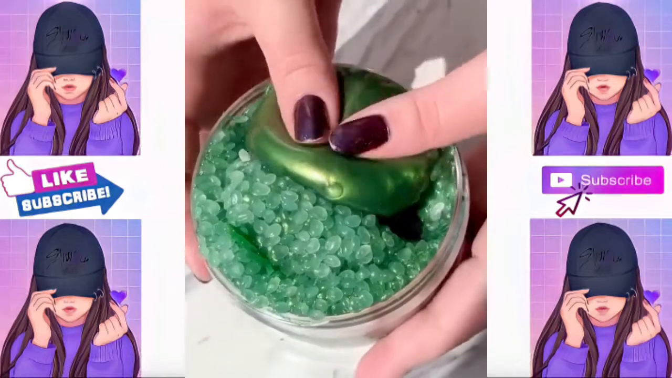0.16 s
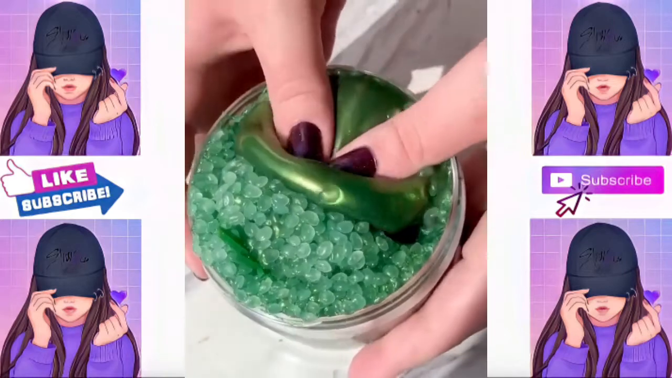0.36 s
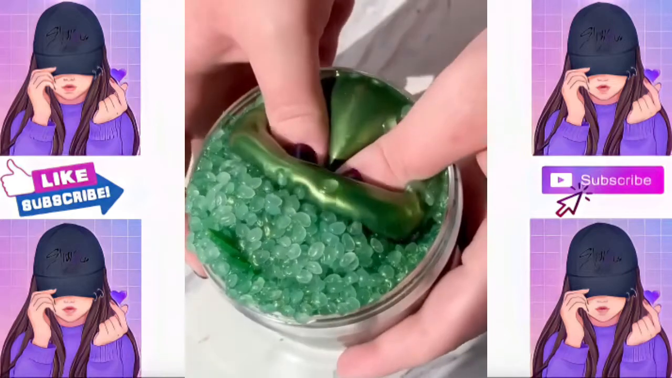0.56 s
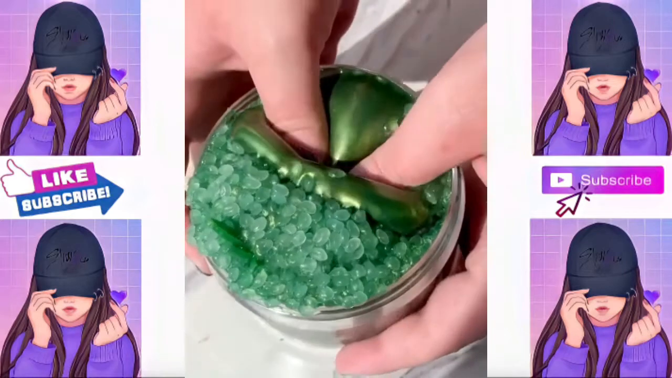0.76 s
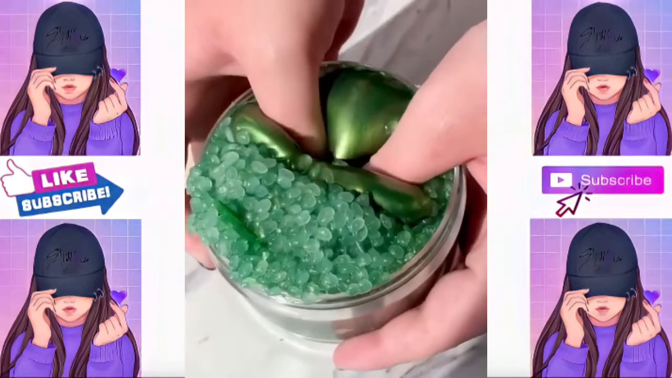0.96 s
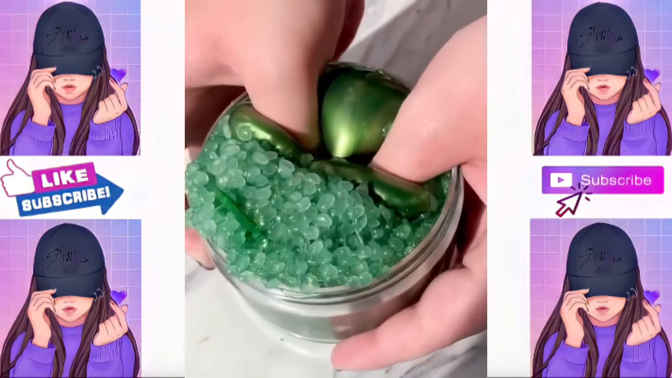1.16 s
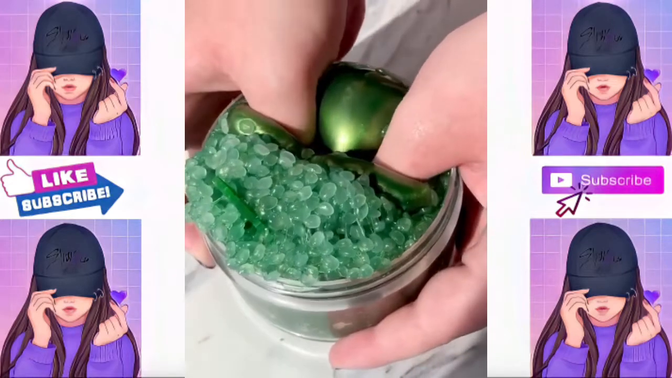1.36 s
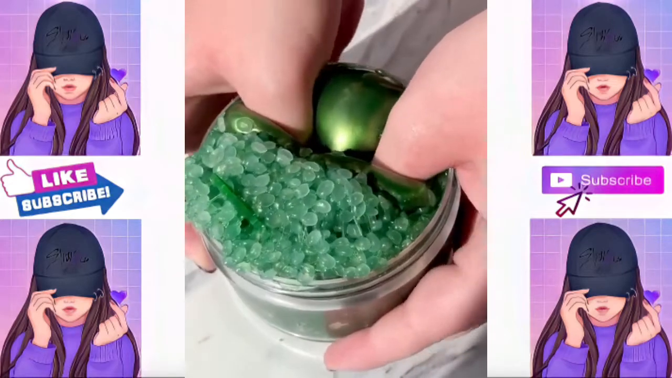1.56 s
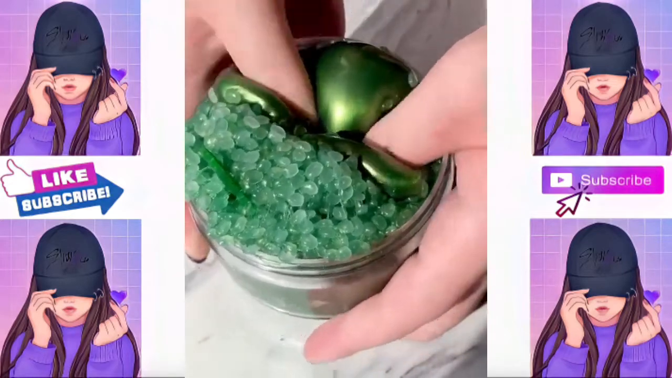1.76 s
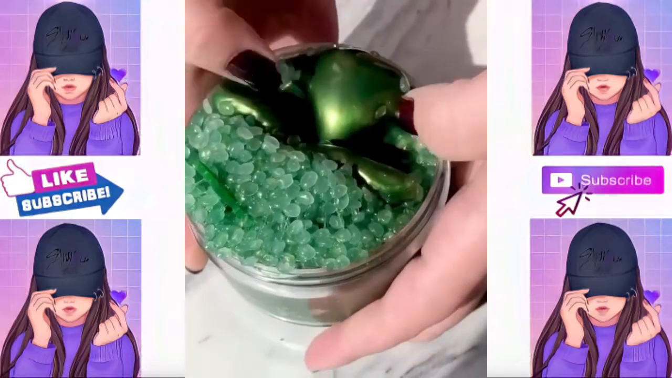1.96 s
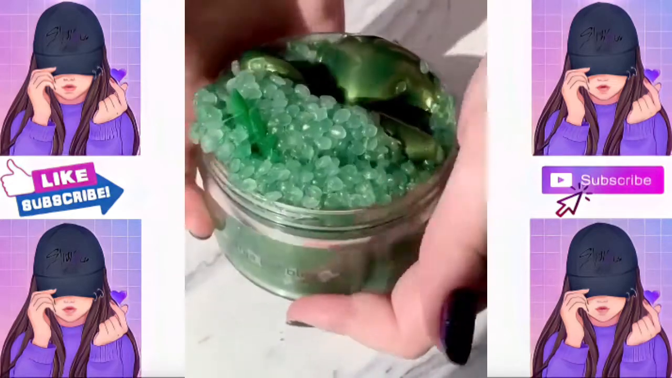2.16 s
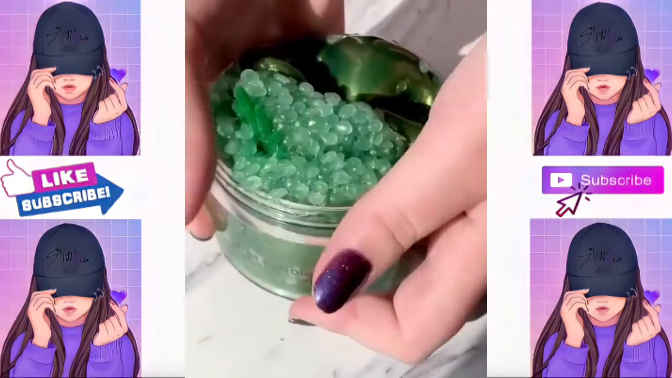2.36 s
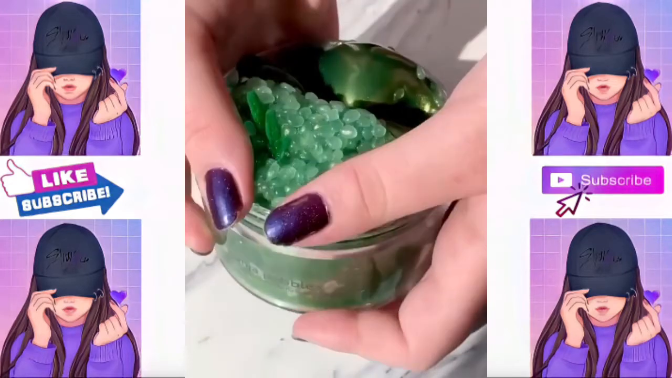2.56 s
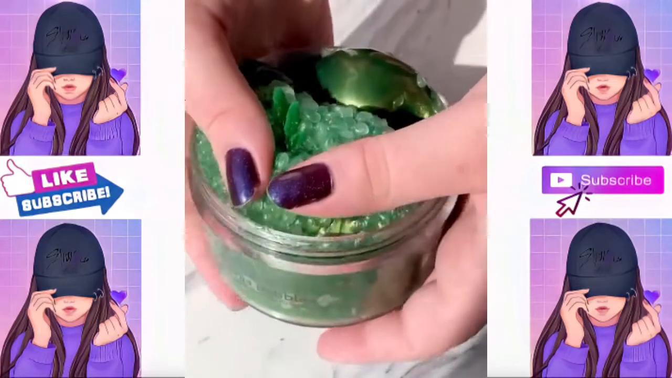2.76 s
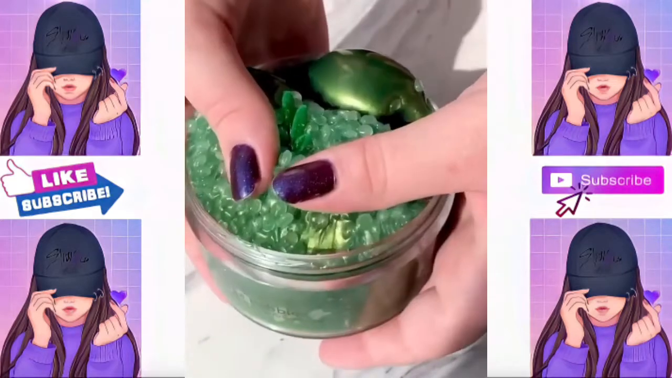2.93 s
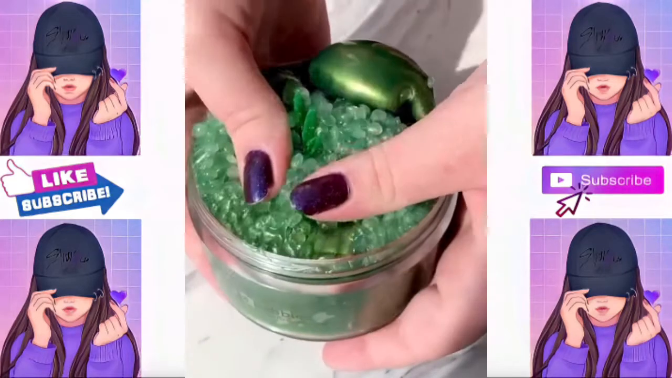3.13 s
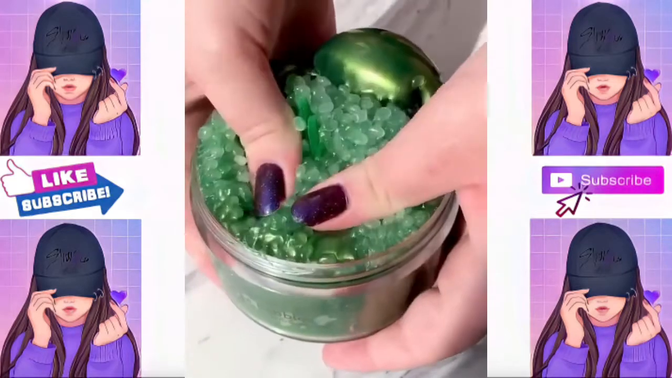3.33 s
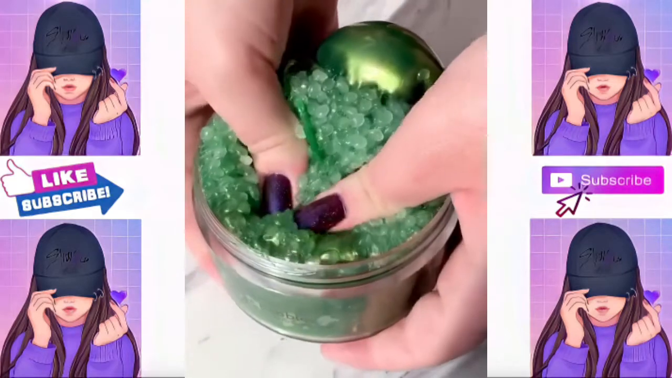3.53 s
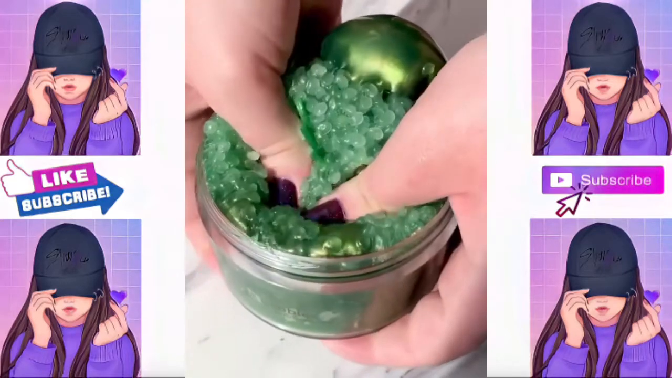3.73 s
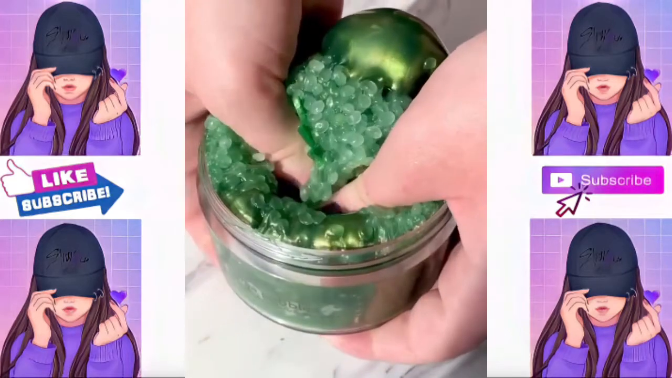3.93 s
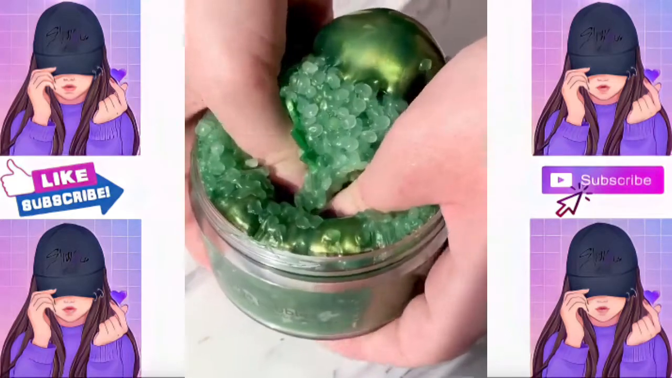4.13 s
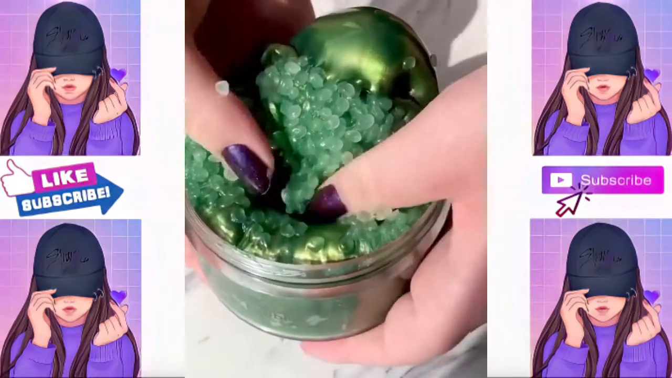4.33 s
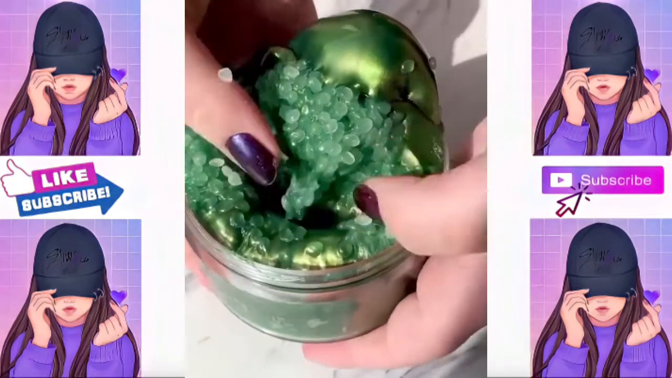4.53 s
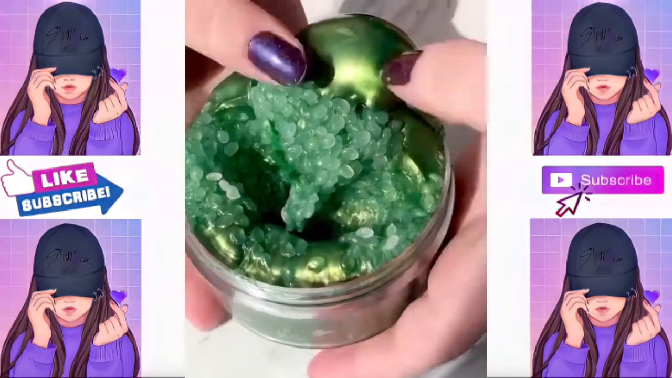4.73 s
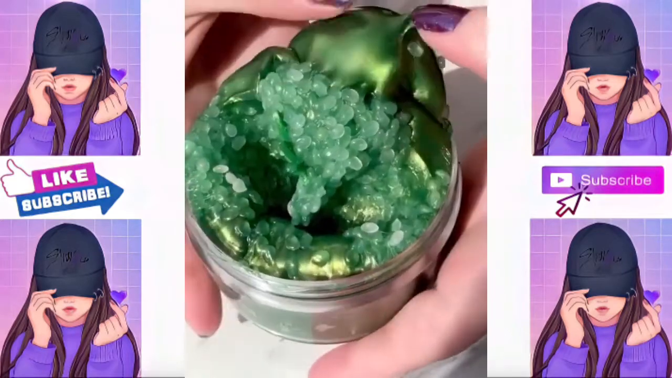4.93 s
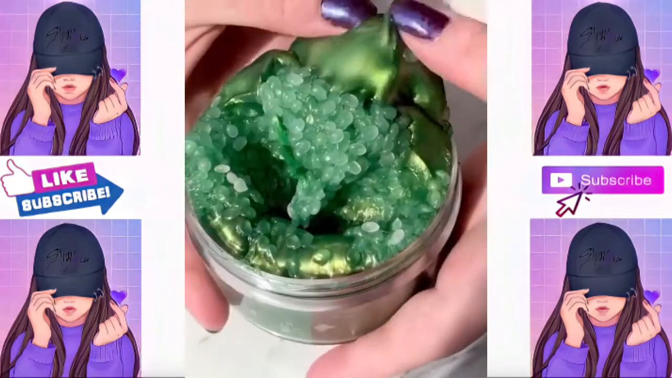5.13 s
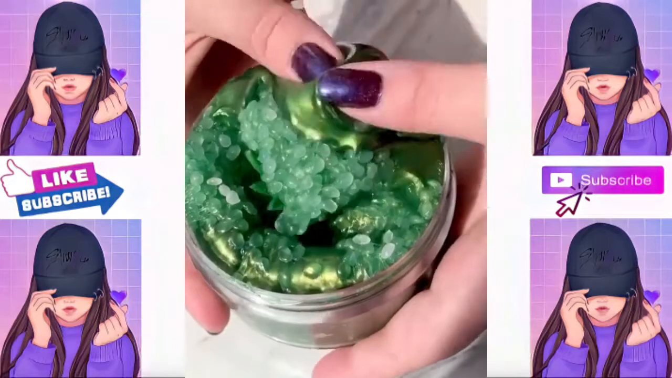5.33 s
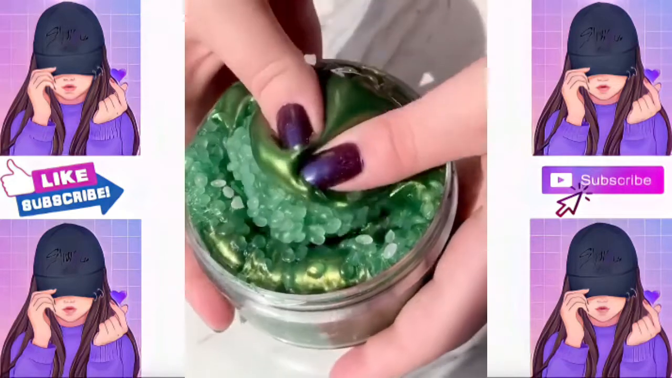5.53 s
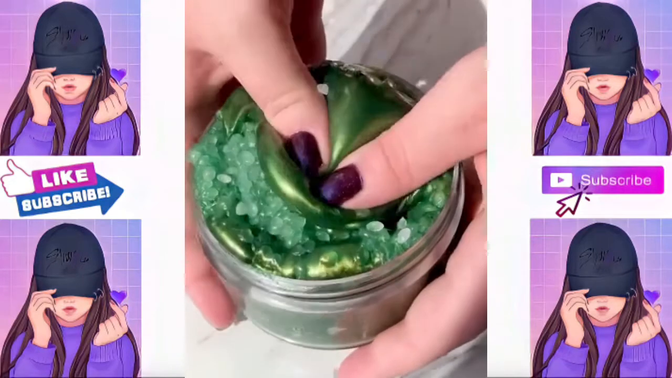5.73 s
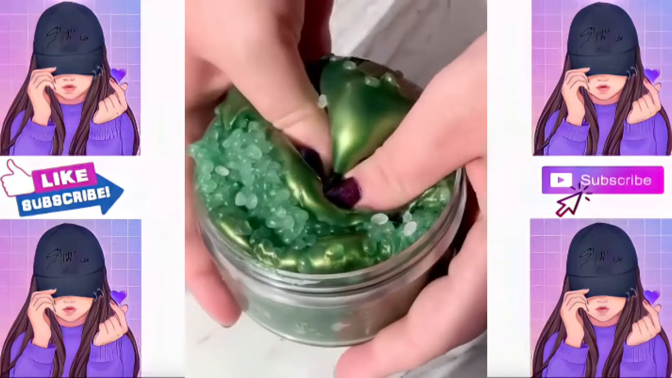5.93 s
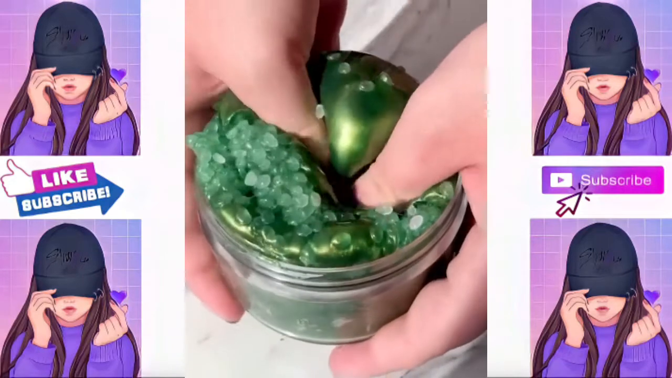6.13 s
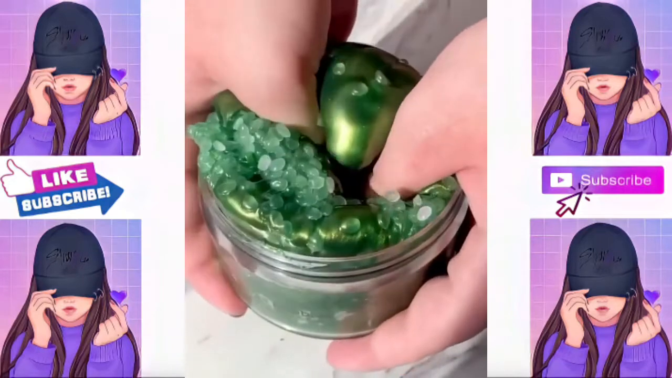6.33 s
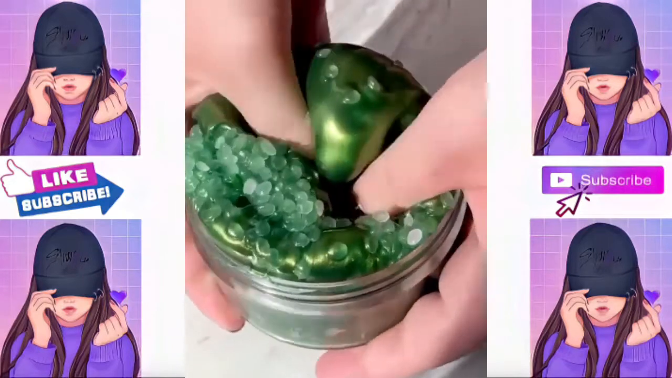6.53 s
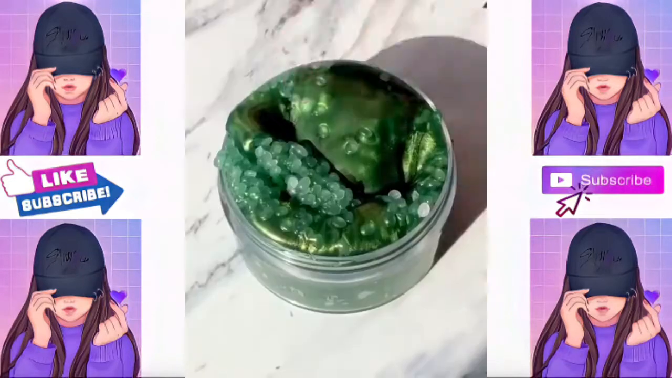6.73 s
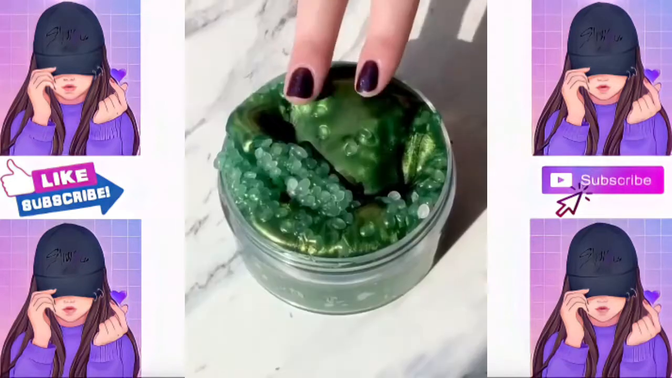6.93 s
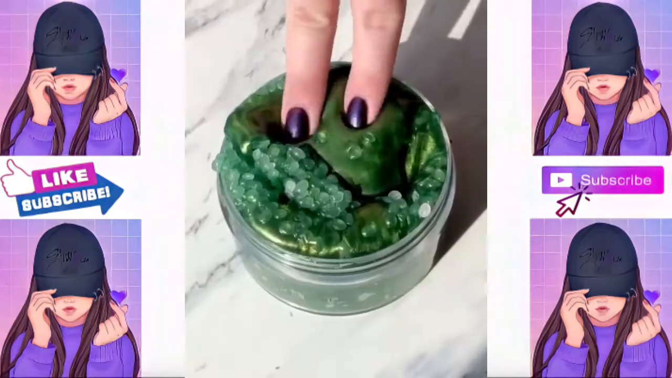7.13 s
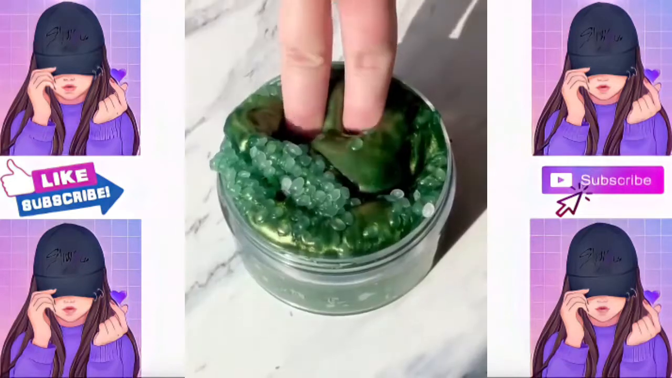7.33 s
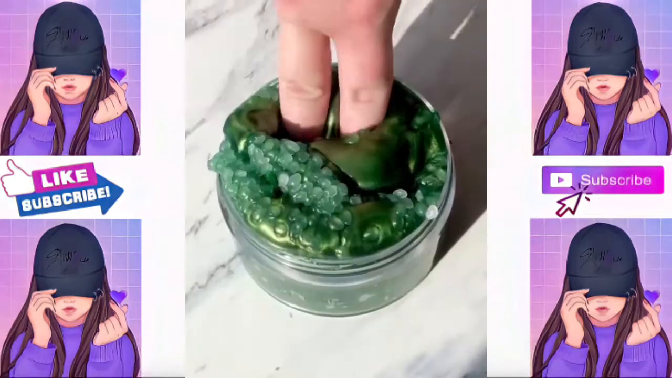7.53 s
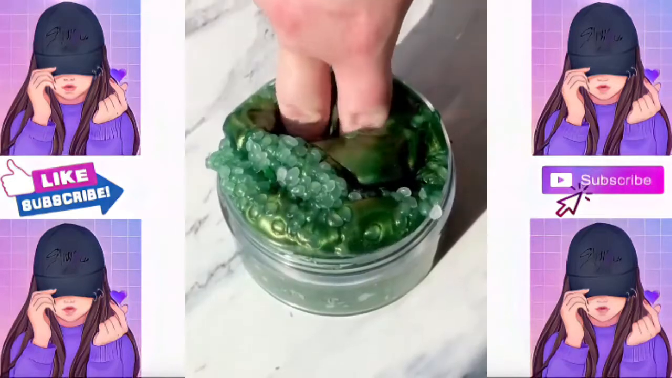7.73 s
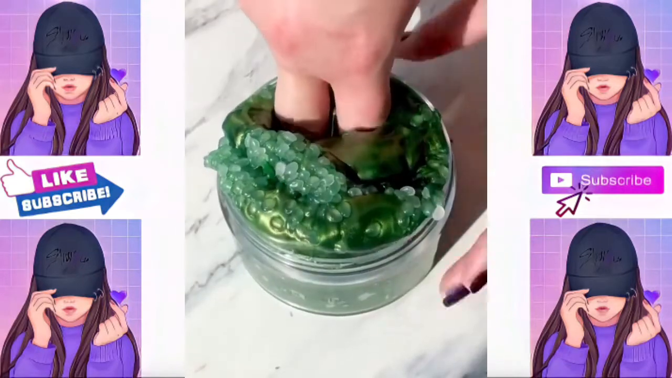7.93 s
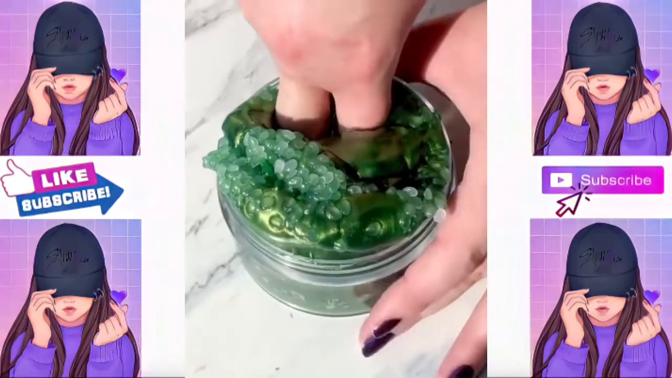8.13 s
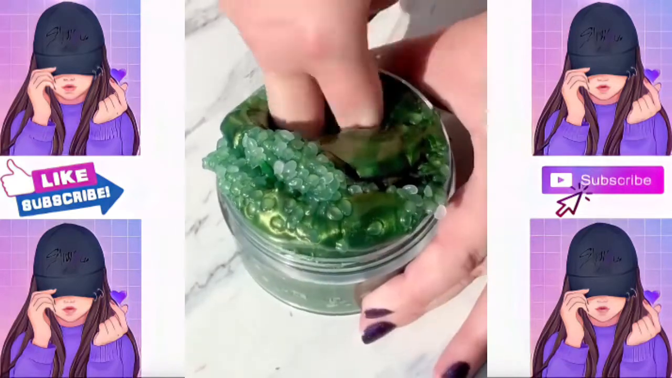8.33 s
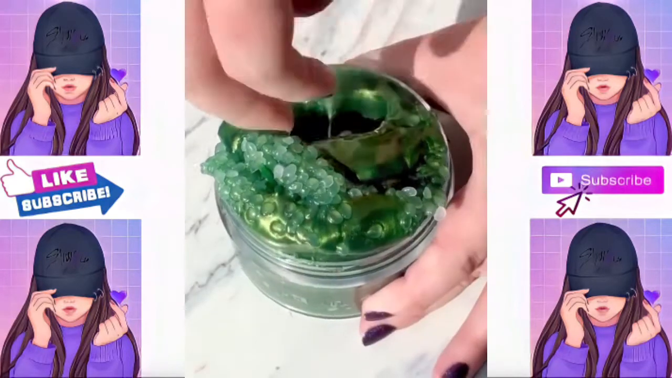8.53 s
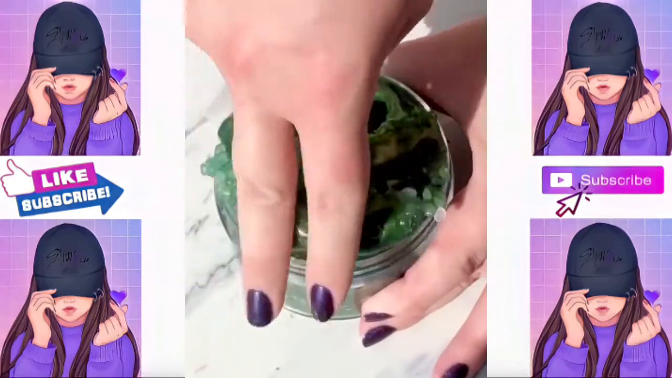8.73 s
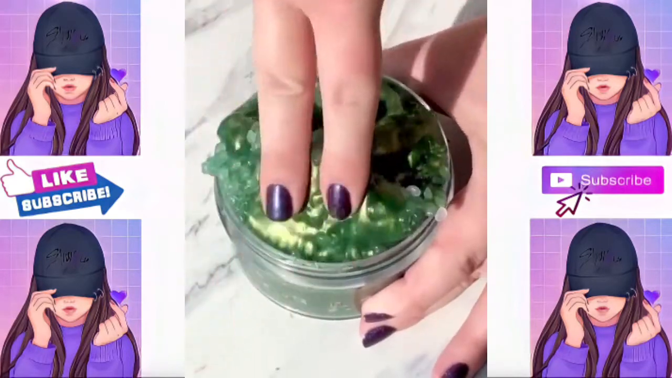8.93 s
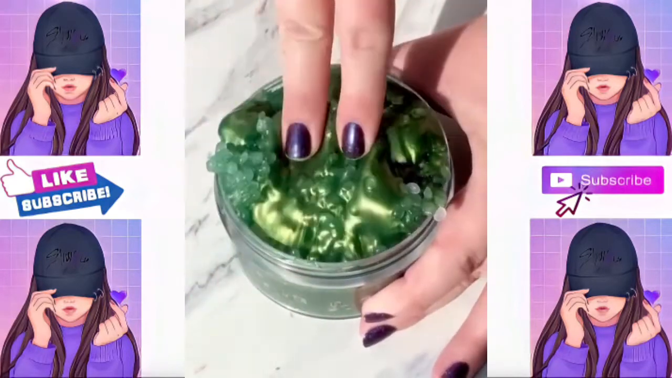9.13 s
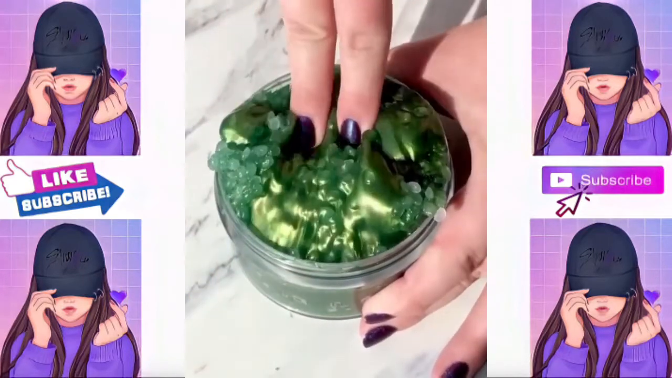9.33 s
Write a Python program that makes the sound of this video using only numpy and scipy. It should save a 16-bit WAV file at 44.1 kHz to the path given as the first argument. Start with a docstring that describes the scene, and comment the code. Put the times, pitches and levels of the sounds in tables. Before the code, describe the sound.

Very close in a quiet room, fingers press into slime packed with plastic beads. Bright crackling and irregular sharp pops come in clusters, with small wet gurgles and brief sucking squelches as fingers pull free. After a sparse stretch, a loud wet burst and jar thump come just past eight seconds, then lighter scattered pops. A faint low room rumble stays underneath.

```python
"""Wet pops, bead crackle and squelches, close up in a quiet room: fingers knead bead-filled slime in a jar.
Pops are damped pitches with a smack, clacks, ticks and a rattle; small bubbles are smeared single pitches.
Kneading scatters short rings over a lumpy rasp; pulls add hollow noise and ring the jar; rubs are smooth hiss.
Jar bumps shake the modes of a table, and shaped noise with wavering tones makes the rumble and hum."""
import sys
import numpy as np
from scipy import signal
from scipy.fft import rfft, irfft
from scipy.io import wavfile
from scipy.ndimage import uniform_filter1d

SR = 44100
rng = np.random.default_rng(int(sys.argv[2]) if len(sys.argv) > 2 else 0)


def put_to_file(sound):
    """Save the sound as 16-bit audio at rate SR, in the file named by the first command-line argument."""
    columns = np.atleast_2d(sound).T  # one column per channel
    safe = np.clip(columns, -1, 1)
    whole_steps = np.round(safe * 32767)
    wavfile.write(sys.argv[1], SR, whole_steps.astype(np.int16))


N = 414099  # length in samples

# Spectrum of the room's rumble and hiss. Each row: frequency in Hz, relative density in dB per Hz.
ROOM_SPECTRUM = [(30, -26.5), (50, -22), (100, -2.5), (240, -7), (330, -15.5), (590, -20), (1110, -24),
                 (2400, -30), (5600, -41.5), (13000, -48)]
ROOM_DB = -56.5
# Wavering hum tones. Each row: pitch in Hz, width in Hz, level in dB.
HUM_TONES = [(47.5, 5, -65.5), (62, 9.4, -65.5), (110.7, 20, -67), (191.3, 23, -67), (233.3, 6.2, -64.5)]
# Jar bumps on the table. Each row: start in seconds, level in dB, rise in seconds,
# decay by 60 dB in seconds for the narrowest table mode.
BUMPS = [(2.755, -44, 0.014, 0.35), (3.171, -35.5, 0.0037, 0.034), (3.909, -46.5, 0.0054, 0.33),
         (3.925, -42, 0.035, 0.46), (7.547, -38.5, 0.085, 0.84), (8.325, -25.5, 0.0072, 0.45),
         (8.351, -29, 0.006, 0.7)]
# Modes of the table top. Each row: pitch in Hz, width in Hz, relative level in dB.
TABLE_MODES = [(97.2, 13.7, -10), (124, 17, -8), (178.8, 26, 0), (278, 49, -5.5), (368, 77, -3.5),
               (609, 230, -3), (925, 300, -4.5)]
# Modes of the plastic jar wall. Each row: pitch in Hz, width in Hz, relative level in dB.
JAR_MODES = [(1420, 47, -6), (1960, 42, -9), (3060, 140, -5.5), (3740, 110, -1.5), (4370, 150, -2),
             (6050, 100, -1.5), (7130, 120, -6.5), (9040, 330, -1)]
# Skin sliding along the jar. Each row: start, loudest and end in seconds, level in dB.
# A row whose end comes before its start stays silent.
RUBS = [(4.473, 4.508, 4.32, -53.5), (6.752, 6.776, 6.92, -58), (7.818, 7.852, 7.92, -51.5)]
RUB_HZ, RUB_JAR_DB = 4450, 2  # centre of the hiss, and how much the jar wall colours it
# Kneading, one list for each stretch between pulls.
# Each row: time in seconds, bead crackle in dB, wet squish in dB, both before clumping.
KNEAD_STRETCHES = [
    [(0.0, -69, -91), (0.166, -67, -74.5), (0.638, -62, -64), (0.766, -55, -67), (0.86, -56.5, -64),
     (1.464, -70, -67.5), (1.66, -69.5, -73)],
    [(1.88, -66.5, -67), (2.42, -92, -94), (2.62, -52, -62), (2.79, -52.5, -59), (3.08, -65, -62),
     (3.78, -59.5, -64), (4.13, -71, -72)],
    [(4.42, -74, -79), (4.54, -73.5, -84.5), (5.29, -83, -74), (5.53, -64, -60.5), (5.96, -63.5, -62),
     (6.36, -60.5, -61.5), (6.46, -84, -71)],
    [(6.69, -71.5, -66.5), (7.174, -81, -81), (7.314, -70, -69), (7.522, -65.5, -67.5), (7.672, -70, -72),
     (7.79, -73, -74)],
    [(7.94, -70, -63), (8.122, -76, -67), (8.26, -85, -99)],
    [(8.5, -88, -69), (8.7, -79.5, -90), (8.88, -67, -74), (8.998, -81, -77), (9.096, -73, -68),
     (9.39, -59, -62.5)],
]
CLUMP_DB = 4  # spread of the level as beads give way in clumps
# Fingers sliding out or along the wet mass. Each row: start, loudest and end in seconds, crackle in dB,
# squish in dB, first and last hollow pitch in Hz, hollow level in dB against the squish, jar drive in dB.
PULLS = [(1.668, 1.786, 1.85, -43, -58.5, 1496, 1575, 4.5, -2),
         (4.168, 4.218, 4.41, -43.5, -50.5, 2666, 2200, 1, -16),
         (6.489, 6.557, 6.59, -42.5, -48.5, 2700, 2450, -2, -10),
         (6.559, 6.595, 6.668, -43.5, -50.5, 1153, 2440, 1.5, -17),
         (8.289, 8.34, 8.475, -38.5, -37, 3580, 1480, -28, 1.5)]
PULL_START_DB, PULL_END_DB, PULL_BEND = -58, -68, 1.08  # levels a pull swells from and sinks to; curve
PULL_EXTRA_GRAINS = 2.7  # share of extra squish grains while pulling
# Small bubbles gurgling out of the wet mass. Each row: start in seconds, level in dB, pitch in Hz.
BUBBLES = [(0.39, -43, 1280), (1.1726, -35.5, 2740), (1.193, -39.5, 3240), (1.216, -45, 4300),
           (1.324, -41, 2770), (1.3795, -41, 2350), (1.391, -47, 1260), (1.446, -48, 1900),
           (1.48, -50, 1900), (1.506, -46, 1800), (2.523, -29, 10500), (2.629, -41, 2000),
           (2.697, -39, 4980), (2.786, -34, 2900), (2.794, -35, 6290), (2.806, -38, 5670),
           (3.353, -27.5, 2570), (3.6863, -32.5, 5030), (3.769, -38.5, 3000), (3.88, -47, 1800),
           (3.901, -38.5, 2850), (3.977, -45, 4200), (4.053, -44, 2500), (4.061, -46, 1980),
           (4.384, -39, 2690), (5.331, -35.5, 2010), (5.348, -40, 2400), (5.397, -43.5, 2970),
           (5.459, -37.5, 2180), (6.32, -37, 2890), (6.363, -42, 2330), (6.386, -34.5, 2820),
           (6.412, -45, 2600), (6.4645, -44, 2690), (6.475, -43, 2800), (8.403, -36.5, 4076),
           (9.041, -25, 10200), (9.341, -41, 2600)]
GURGLE_TURNS, GURGLE_S = 14, 0.02  # cycles a bubble rings, seconds of smear, each to fall 60 dB
# Air pockets bursting. Each row: time in seconds, level in dB, pocket pitch in Hz,
# bead clack in dB and bead tick in dB, both trims against the pop's level.
POPS = [(0.1165, -29, 8250, -11.5, -12), (0.3295, -38, 8850, -27, 4), (0.3447, -16.5, 9340, -42, -25),
        (0.583, -31, 5000, -3, -31), (0.61, -35, 2430, -6, -10), (0.6187, -32, 9200, -6, -11),
        (0.643, -28, 6200, -35, -2), (0.653, -44, 7700, -16, 10), (0.682, -18, 9400, -35, -20),
        (0.7044, -34.5, 4770, -15, -7), (0.738, -24, 9500, -18, -5), (0.747, -27, 11700, -26, -22),
        (0.806, -36.5, 4850, 0.5, -26), (0.849, -20, 9250, -8.5, -4.5), (0.8822, -34.5, 2760, -13, -9),
        (0.908, -32, 4850, -21, -14), (0.971, -24.5, 8400, -32, -25), (0.9843, -35, 5070, -10, -9),
        (1.009, -31.5, 2780, -4, -19), (1.0667, -44, 6050, -3, -12), (1.075, -12, 4310, -12.5, -12),
        (1.0847, -25, 3530, -3, -13), (1.2755, -40, 7560, -15, -1), (1.4387, -37, 2250, -24, -3),
        (1.4636, -33, 2930, -8, -2.5), (1.713, -27, 1520, -17, -16), (1.7276, -18.5, 7600, -25, -13),
        (1.7514, -15, 7300, -17, -1.5), (1.7714, -27.5, 6700, -25, -10), (2.4292, -27, 11500, -21, -25),
        (2.4418, -32, 12200, -25, -8), (2.4712, -26.5, 8550, -10.5, -34), (2.516, -28.5, 11900, -18, -19),
        (2.561, -22, 10600, -30, -9), (2.601, -28, 7950, -27, 0), (2.615, -26, 5360, -18, -2.5),
        (2.6718, -26, 7900, -13, -16), (2.682, -31, 8450, -1.5, -19), (2.76, -45, 2370, 2, 7),
        (2.7722, -32, 1650, 5.5, 11), (2.8368, -35.5, 1670, -20, -16), (2.86, -26, 12400, -31, -6),
        (2.888, -30, 5490, -29, -13), (2.9002, -2, 11460, -58, -20), (3.0659, -31.5, 9600, -6, -7),
        (3.0788, -27.5, 1480, -27, 0), (3.098, -32, 2550, -17, -3), (3.1707, -21.5, 2620, -4.5, -3.5),
        (3.1709, -19.5, 1490, -13, -19), (3.298, -27.5, 8240, -32, -9), (3.338, -31.5, 2600, -19, -7),
        (3.3513, -9.5, 10600, -42, -9), (3.3511, -13.5, 5160, -24, -41), (3.492, -34, 5500, -10, 0),
        (3.5214, -29, 2780, -6, -4.5), (3.601, -33, 1230, -12, -15), (3.633, -33, 1320, 2, -5),
        (3.651, -33, 5630, -22, -13), (3.752, -31.5, 4140, -28, -8), (3.87, -34, 4000, -6, -38),
        (4.0299, -27, 12400, -26, -5), (4.185, -35, 2360, -4, -19), (4.1914, -39, 2450, -12, -14),
        (4.2058, -30, 2900, -2, -23), (4.2224, -30.5, 1680, -3, -26), (4.229, -22.5, 2900, -11, -25),
        (4.2462, -28, 4090, -11, -6), (4.291, -40, 1984, -22, 7), (5.2999, -15.5, 7900, -10.5, -9),
        (5.421, -42, 1270, -4, -17), (5.44, -36, 2360, 1.5, -0.5), (5.4798, -37, 10000, -6, -10),
        (5.5001, -41, 2720, 1.5, 4), (5.547, -31, 2030, -34, -17), (5.671, -25.5, 4780, -8.5, -25),
        (5.779, -33, 7500, -23, -16), (5.805, -29.5, 4940, -33, -2), (5.814, -36, 9000, -25, -2),
        (5.8408, -21.5, 10900, -9.5, -30), (5.8475, -35, 5260, -21, 8.5), (5.8661, -28, 5550, 2, -9),
        (5.903, -27.5, 8700, -9, -12), (5.923, -35.5, 8500, -33, 4), (5.9721, -31, 2820, -9.5, -5),
        (6.0154, -20.5, 11000, -9.5, -20), (6.084, -34, 7060, -23, -24), (6.182, -21.5, 8000, -13, -26),
        (6.286, -34, 2750, -6, -6), (6.3086, -26.5, 11600, -10.5, -1.5), (6.346, -31, 3060, -23, -8),
        (6.396, -27, 2880, -26, -7), (6.492, -32.5, 2660, -27, -3.5), (6.504, -34, 2780, -25, 0),
        (6.531, -23.5, 4860, -22, -5.5), (6.544, -21, 2400, -14, -16), (6.5501, -25, 2900, -2, -20),
        (6.6246, -34, 1900, -26, -2), (8.028, -37, 3440, -7, -18), (8.328, -4.5, 3760, -17, -29),
        (8.3277, -5, 6760, -46, -41), (8.325, -4.5, 8800, -32, -30), (8.358, -11, 3100, -9.5, -15),
        (8.36, -15, 7130, -6.5, -24), (8.797, -41, 5540, -18, 0), (8.807, -48, 5000, -8, 0),
        (8.898, -41, 1460, 2.5, -10), (8.943, -37, 6270, -13, -2), (8.9562, -14.5, 6370, -39, -39),
        (9.0166, -10, 10300, -42, -38), (9.052, -15.5, 10000, -43, -26), (9.127, -30, 9780, -36, -8),
        (9.1347, -23.5, 11000, -10.5, -32), (9.143, -30, 8600, -31, -10), (9.194, -34.5, 9600, -16, 0),
        (9.242, -41, 1740, 2, -5), (9.259, -20.5, 8800, -43, -8), (9.3777, -39.5, 3200, -6, -23)]
RING_DB, SMACK_DB, CLACK_DB, TICK_DB = -2.5, -7, 0, 7  # balance of a pop's parts
SAG_HZ = -60  # pocket pitch sags as it opens
TEAR_S = .0012  # the skin tears for this long before the pocket is fully open
STIR_DB, STIR_S, BEFORE = -32.5, 0.017, 0.06  # bead stir around a pop: level, time constant, power share before it
# Scrambled-phase noise following the bed, added left and subtracted right.
# Each row: frequency in Hz, level in dB.
SIDE_SPECTRUM = [(700, -49.5), (3200, -63), (4000, -18.5), (7500, -3), (13000, -7)]
# The whole level dips briefly. Each row: time in seconds, level in dB.
DIP = [(6.68, -2.5), (6.748, -14.5), (6.77, -2.5)]
EDGE_HZ = 13050  # upper band limit


def amp(db):
    """Decibels to amplitude."""
    return 10 ** (np.asarray(db) / 20)


def unit(x):
    """Scale to an RMS of 1."""
    return x / np.sqrt(np.mean(x ** 2) + 1e-20)


def read(points, hz):
    """Read a spectrum between its points along a log frequency axis."""
    f, value = np.transpose(points)
    return np.interp(np.log(hz + 1), np.log(f + 1), value)


def add(mix, s, sound):
    """Lay a sound into the mix at s seconds, cut at the end."""
    part = mix[round(s * SR):][:len(sound)]
    part += sound[:len(part)]


def resonate(x, hz, width):
    """One ringing mode of gain 1; a wider mode dies sooner."""
    pole = np.exp((2j * np.pi * hz - np.pi * width) / SR)
    return 2 * signal.lfilter([1 - abs(pole)], [1, -pole], x).real


def ping(hz, turns, glide=0., size=600):
    """A damped ring of peak 1 that loses 60 dB in the given turns and slides in pitch."""
    u = np.arange(size) / SR * hz  # time in cycles
    envelope = amp(-60 * u / turns) * (1 - np.exp(-u / 0.37))
    ring = envelope * np.sin(2 * np.pi * (u + glide * u ** 2 / (1 + u / 4)))
    return ring / abs(ring).max()


def jar_wall(x):
    """The jar wall rings at its modes when driven by x."""
    return sum(amp(db) * resonate(x, hz, width) for hz, width, db in JAR_MODES)


def room_tone():
    """Steady coloured rumble and hiss, with narrow tones that waver because they are filtered noise."""
    colour = amp(read(ROOM_SPECTRUM, np.fft.rfftfreq(N, 1 / SR)))
    air = irfft(rfft(rng.standard_normal(N)) * colour, N)
    hum = np.zeros(N)
    for hz, width, db in HUM_TONES:
        tone = resonate(resonate(rng.standard_normal(N), hz, width), hz, width)
        hum += amp(db) * unit(tone)
    return amp(ROOM_DB) * unit(air) + hum


def bumps():
    """Each bump shakes the table top; a slow push favours its low modes, and wide modes die sooner."""
    out, t = np.zeros(N), np.arange(SR // 2) / SR
    hz, width, mode_db = np.transpose(TABLE_MODES)[:, :, None]
    for s, db, rise, t60 in BUMPS:
        steps = rng.standard_normal((len(TABLE_MODES), len(t)))
        wobble = np.cumsum(steps, axis=1) * np.sqrt(width / SR / 2)  # drifting phase
        fade_db = -60 * np.maximum(t - rise, 0) / t60 * width / width.min()
        reach = 1 / (1 + (hz * rise / 8) ** 2)
        ring = reach * amp(db + mode_db + fade_db) * np.sin(2 * np.pi * hz * t + wobble)
        add(out, s, ring.sum(axis=0) * np.minimum(t / rise, 1))
    return out


def rubbing():
    """Smooth, broad friction hiss that the jar wall colours."""
    t = np.arange(N) / SR
    air = resonate(rng.standard_normal(N), RUB_HZ, 4200)
    air = unit(air + amp(RUB_JAR_DB) * jar_wall(air))
    return air * sum(amp(db) * np.sqrt(np.interp(t, [a, top, b], [0, 1, 0])) for a, top, b, db in RUBS)


def effort():
    """Crackle and squish levels in dB: kneading, the swell of each pull, and beads stirred by pops."""
    t = np.arange(N) / SR
    s, *kneads = np.transpose(np.concatenate(KNEAD_STRETCHES))
    clumps = unit(uniform_filter1d(rng.standard_normal((2, N // 200 + 1)), size=9))
    clumps = np.repeat(clumps, 200, axis=1)[:, :N]
    power = amp([np.interp(t, s, db) for db in kneads] + CLUMP_DB * clumps) ** 2

    for start, top, end, *peaks_db in np.array(PULLS)[:, :5]:
        away = np.interp(t, [start, top, end], [-1, 0, 1])  # 0 at the loudest moment
        edge_db = np.where(away < 0, PULL_START_DB, PULL_END_DB)
        gate = np.minimum(4 * (1 - abs(away)), 1) ** 2
        for layer, db in enumerate(peaks_db):
            swell_db = db + np.minimum(edge_db - db, 0) * abs(away) ** PULL_BEND
            power[layer] += gate * amp(swell_db) ** 2

    s, db = np.transpose(POPS)[:2]
    lag = np.arange(-8000, 8001) / SR
    # loud pops stir no more than a -22 dB one
    kicks = np.bincount((s * SR).astype(int), amp(np.minimum(db, -22) + STIR_DB) ** 2, N)
    stir = np.exp(-abs(lag) / STIR_S) * np.where(lag < 0, BEFORE, 1)
    power[0] += abs(signal.oaconvolve(kicks, stir, "same"))
    return 10 * np.log10(uniform_filter1d(power, size=200) + 1e-12)


def hollow(squish_db):
    """The finger hole sings as air sucks through it; returns the sound, where pulls run and the jar tug."""
    out, pulling, tug = np.zeros((3, N))
    for start, _, end, _, _, first_hz, last_hz, db, jar_db in PULLS:
        size = round((end - start) * SR)
        air = rng.standard_normal((2, size))
        waver = 1 + 0.097 * unit(uniform_filter1d(air[1], size=700))
        hz = np.geomspace(first_hz, last_hz, size) * waver
        flutter_db = 4 * unit(uniform_filter1d(air[1, ::-1], size=300))
        band = resonate(resonate(air[0], 0, 400), 0, 400) * amp(flutter_db)
        gate = signal.windows.tukey(size, .2)
        # low noise on a gliding carrier becomes a breathy pitch
        breath = unit(band * np.cos(2 * np.pi * np.cumsum(hz) / SR))
        add(out, start, amp(db) * breath * gate)
        add(pulling, start, gate)
        add(tug, start, amp(jar_db) * gate)
    return out * amp(squish_db), pulling, tug


def grains(level_db, low_hz, high_hz, tilt_db, turns, spread_db, per_s, fizz_db, lumps_db):
    """Small bursts, each a few pitches with a rattle, over a lumpy wet rasp; fizz sets rasp against bursts."""
    hits = rng.random(N) < per_s / SR
    size = amp(spread_db * np.minimum(rng.exponential(1, N), 2.2)) * hits
    fizz = amp(fizz_db)
    pitches = np.geomspace(low_hz, high_hz, num=16)
    weight = amp(tilt_db * np.log2(pitches / low_hz))  # tilt in dB per octave
    rings = [ping(hz, turns, glide=-0.017, size=500) for hz in pitches]
    rings = np.array([w * ring / np.linalg.norm(ring) for w, ring in zip(weight, rings)])
    kind = rng.integers(0, len(pitches), N)
    clicks, rasp = np.zeros(N), np.zeros(N)
    for k, ring in enumerate(rings):
        loose = rng.standard_normal(500) * amp(-60 * np.arange(500) / SR / 0.017)
        others = amp(-7 * rng.exponential(1, len(rings)) - 17.5) * rng.choice([-1, 1], len(rings))
        burst = ring + others @ rings
        rattle = signal.fftconvolve(burst, loose / np.linalg.norm(loose))
        burst = np.append(burst, np.zeros(499)) + rattle
        clicks += signal.oaconvolve(size * (kind == k), burst)[:N]
        lumps = unit(uniform_filter1d(rng.standard_normal(N // 100 + 1), size=6))
        lumps = np.repeat(lumps, 100)[:N]
        rasp += signal.oaconvolve(rng.standard_normal(N) * amp(lumps_db * lumps), ring)[:N]
    return amp(level_db) * (unit(clicks) + fizz * unit(rasp)) / np.sqrt(1 + fizz ** 2)


def kneading():
    """Bright bead crackle over duller wet squish; a pull or a still hand leaves rasp rather than clicks."""
    crackle_db, squish_db = effort()
    suck, pulling, tug = hollow(squish_db)
    still_db = np.clip(-62 - crackle_db, 0, 13)  # quiet crackle counts as a still hand
    fizz_db = 8 * pulling + still_db - 7.5
    squish_rate = 170 * (1 + PULL_EXTRA_GRAINS * pulling)
    crackle = grains(crackle_db, 3500, 11000, tilt_db=3.5, turns=5.2, spread_db=7,
                     per_s=260, fizz_db=fizz_db, lumps_db=4.5)
    squish = grains(squish_db, 450, 3050, tilt_db=4.0, turns=8.5, spread_db=4.5,
                    per_s=squish_rate, fizz_db=fizz_db, lumps_db=6.0)
    wet = crackle + squish
    return wet + suck + jar_wall(wet * tug)


def bubbles():
    """One rounded pitch that rises a little, smeared by the wet mass."""
    out, t = np.zeros(N), np.arange(900) / SR
    noise = rng.standard_normal((len(BUBBLES), len(t)))
    for (s, db, hz), smear in zip(BUBBLES, noise):
        ring = ping(hz, GURGLE_TURNS, glide=.004)
        smear = smear * amp(-60 * t / GURGLE_S)
        direct = t == 0
        add(out, s, amp(db) * np.convolve(ring, smear / np.linalg.norm(smear) / 2 + direct))
    return out


def pops():
    """The pocket rings at its pitch; the wet wall smacks low, beads clack and tick higher, shards rattle after."""
    out, t = np.zeros(N), np.arange(600) / SR
    chance = rng.random((len(POPS), 5))
    shards = rng.standard_normal((len(POPS), len(t)))
    wait = np.zeros(round(TEAR_S * SR))
    for (s, db, hz, clack_db, tick_db), (a, b, c, d, e), rattle in zip(POPS, chance, shards):
        pop = amp(RING_DB) * ping(hz, turns=2.2 + hz / 500, glide=SAG_HZ / hz)
        pop += amp(SMACK_DB + clack_db) * ping(1700 + 600 * a, turns=7, glide=-.05)
        pop -= amp(CLACK_DB + clack_db) * ping(3100 + 1500 * b, turns=9)
        ticks = ping(7400 + 1600 * c, turns=15) + ping(9800 + 1600 * d, turns=15)
        pop += amp(TICK_DB + tick_db) * ticks / 2
        pop += amp((clack_db + tick_db) / 2) * ping(5200 + 1200 * e, turns=12)  # between clack and tick
        # the rattle grows while the skin tears, then dies away
        loose = rattle * amp(-60 * np.maximum(t - TEAR_S, 0) / 0.024) * np.minimum(t / TEAR_S, 1) ** 2
        rattling = signal.fftconvolve(pop, loose / np.linalg.norm(loose))[:len(t)]
        late = np.append(wait, pop)[:len(t)]
        add(out, s - TEAR_S / 2, amp(db) * (late + amp(-6) * rattling))
    return out


def scatter(x, t60, size):
    """Sound bouncing about: smeared by decaying noise of energy 1."""
    tail = rng.standard_normal(size) * amp(-60 * np.arange(size) / SR / t60)
    return signal.oaconvolve(x, tail / np.linalg.norm(tail))[:N]


def scrambled(x):
    """Noise that follows the spectrum of x over time with random phases, mostly in the treble."""
    hz, _, z = signal.stft(x, SR, nperseg=256)
    phases = np.exp(2j * np.pi * rng.random(z.shape))
    z = abs(z) * amp(read(SIDE_SPECTRUM, hz))[:, None] * phases
    return signal.istft(z, SR, nperseg=256)[1][:N]


def scene():
    """Everything sits in the centre; the bed gets a faint left-right treble difference with scrambled phases."""
    sharp = pops() + bubbles()
    bed = kneading() + rubbing()
    walls = amp(-24.5) * scatter(sharp + bed, 0.17, 6000)
    bed = bed + walls + room_tone()
    mid, side = sharp + bed + bumps(), scrambled(bed)
    level_db = np.interp(np.arange(N) / SR, *np.transpose(DIP))
    return np.array([mid + side, mid - side]) * amp(level_db)


def record(dry):
    """A highpass removes the deepest bass and any offset; then a steep filter limits the treble."""
    dry = signal.sosfilt(signal.butter(3, 35, "high", fs=SR, output="sos"), dry)
    lowpass = signal.firwin(301, EDGE_HZ, window=("kaiser", 7), fs=SR)
    return signal.oaconvolve(dry, lowpass[None], "same")


dry = scene()
out = record(dry)
put_to_file(out)
```